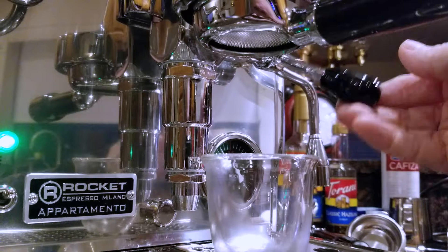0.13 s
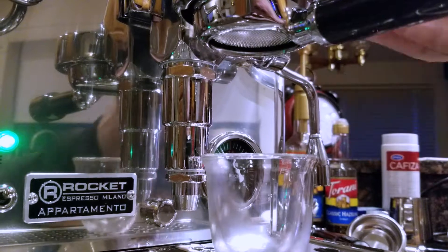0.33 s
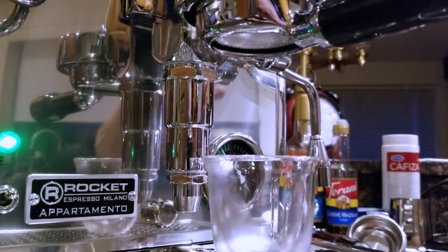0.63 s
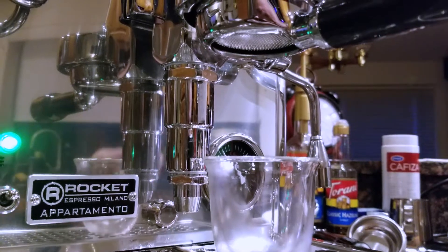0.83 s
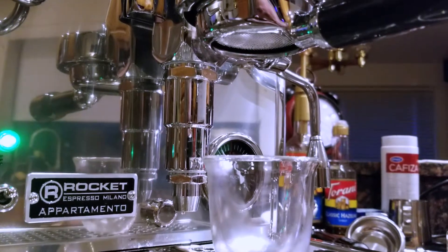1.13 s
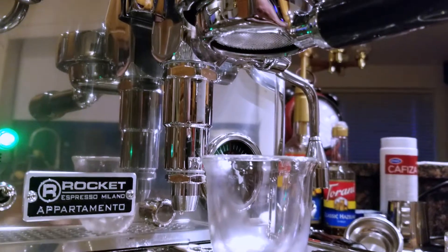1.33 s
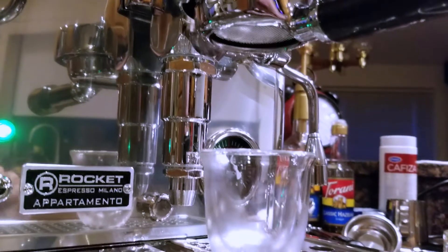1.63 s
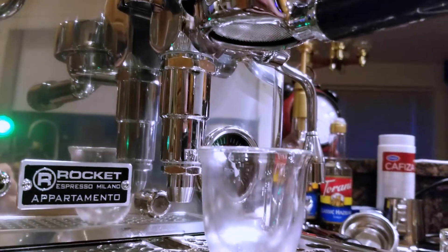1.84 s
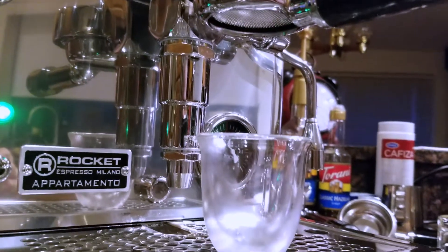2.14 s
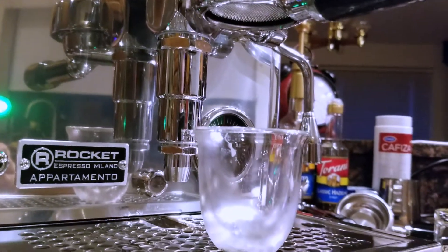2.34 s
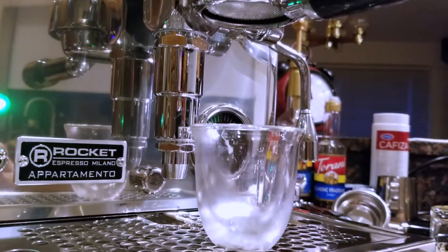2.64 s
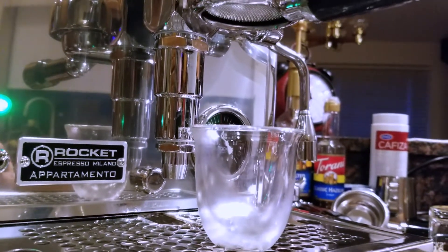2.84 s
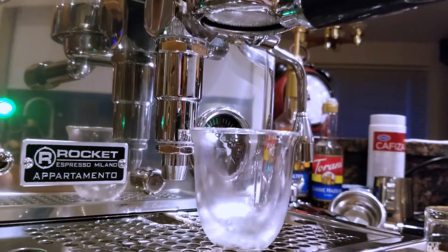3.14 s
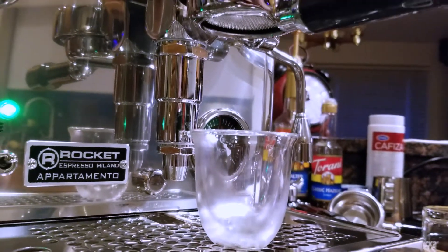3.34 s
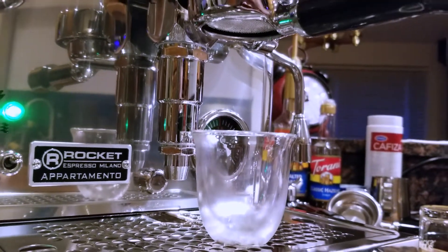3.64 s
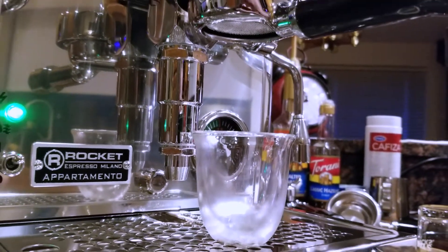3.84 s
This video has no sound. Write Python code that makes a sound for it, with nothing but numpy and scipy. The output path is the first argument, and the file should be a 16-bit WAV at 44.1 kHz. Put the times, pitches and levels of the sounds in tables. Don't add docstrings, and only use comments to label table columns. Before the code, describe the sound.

A lever clicks and thuds, then a vibrating coffee machine pump drones with rattle and hiss

```python
import sys
import numpy as np
from scipy import signal
from scipy.fft import rfft, irfft
from scipy.io import wavfile
from scipy.ndimage import uniform_filter1d

SR = 44100
rng = np.random.default_rng(int(sys.argv[2]) if len(sys.argv) > 2 else 0)


def natural_amplitude(level_db):
    exponent = np.asarray(level_db, float) / 20
    return 10 ** exponent


def bounce(signal):
    frames = np.transpose(np.atleast_2d(signal))
    limited = np.clip(frames, -1, 1)
    pcm = np.round(limited * 32767).astype(np.int16)
    wavfile.write(sys.argv[1], SR, pcm)


N = 176400
START_S = .116
MAINS_HZ, PUMP_ON_S = 60.02, 0.3883


def at(points, x, log=False):
    p, f = np.array(points, float), np.log if log else np.asarray
    return [np.interp(f(x), f(p[:, 0]), column) for column in p.T[1:]]


def unit(x):
    return x / np.sqrt(np.mean(x ** 2) + 1e-20)


def drift(rate):
    r = np.exp(-80 * np.pi * rate / SR)
    noise = rng.standard_normal(N // 40 + 2002)
    slow = signal.lfilter([1], [1, -2 * r, r * r], noise)[2000:]
    return np.interp(np.arange(N) / 40, np.arange(len(slow)), unit(slow))


def filtered(x, order, hz, kind):
    return signal.sosfilt(signal.butter(order, hz, kind, fs=SR, output="sos"), x)


def resonance(x, hz, width_hz):
    r = np.exp(-np.pi * width_hz / SR)
    return signal.lfilter([1, 0, -1], [1, -2 * r * np.cos(2 * np.pi * hz / SR), r * r], x)


# f/Hz, left-right likeness
CHANNEL_LIKENESS = [(60, 0.66), (300, 0.85), (600, 0.64), (1200, 0.14), (3000, 0.027), (15000, 0.048)]


def stereo(hz, pair):
    alike = np.clip(at(CHANNEL_LIKENESS, hz, log=True)[0], 0, 1)
    return np.sqrt(1 + alike) * pair[0] + np.sqrt(1 - alike) * pair[1] * [[1], [-1]]


def coloured(spectrum, low_hz, high_hz, patchy_db):
    out, white = 0, rng.standard_normal((2, 2, N))
    edges = np.geomspace(low_hz, high_hz, int(2 * np.log2(high_hz / low_hz)) + 1)
    for k, (low, high) in enumerate(zip(edges, edges[1:])):
        hz = np.sqrt(low * high)
        pair = filtered(white[k % 2], 2, [low, high], "band")
        level_db = at(spectrum, hz, log=True)[0] + patchy_db * drift(4.6)
        out = out + natural_amplitude(level_db) * stereo(hz, pair)
    return unit(out)


# f/Hz, level/dB per Hz
ROOM_SPECTRUM = [(40, -8), (75, 0), (150, -7), (320, -3), (800, -11), (1200, -22), (2000, -13), (3500, -26),
                 (15800, -27)]
# t/s, level/dB
ROOM_FADE = [(.116, -85), (.17, -83), (.2, -75), (.24, -70), (.3, -69), (.36, -74), (.5, -70)]


def room_tone(t):
    return natural_amplitude(at(ROOM_FADE, t)[0]) * coloured(ROOM_SPECTRUM, 37.3, 17700, patchy_db=3)


# t/s, level/dB
HAND_RUMBLE = [(.12, -95), (.36, -95), (.44, -73), (.6, -77), (.9, -84), (1.04, -68.5), (1.2, -71),
               (2.6, -73), (4, -88)]


def hand_rumble(t):
    low = filtered(rng.standard_normal((2, N)), 4, [40, 68.5], "band")
    return natural_amplitude(at(HAND_RUMBLE, t)[0]) * stereo(60, unit(low))


def kitchen(x):
    t60_s, wall_cut_hz = .26, 5000
    t = np.arange(SR // 2) / SR
    noise = signal.lfilter(*signal.butter(1, wall_cut_hz, fs=SR), rng.standard_normal((2, len(t))))
    tail = noise * natural_amplitude(-60 * t / t60_s) * (t > .003)
    tail = tail / np.sqrt(np.sum(tail ** 2) / 2)
    return signal.fftconvolve(x[None], tail, axes=1)[:, :N]


def strike(where, gains, hz, t60_s):
    clicks = np.full(N, 1e-18)
    clicks[where] = gains
    r, w = natural_amplitude(-60 / (t60_s * SR)), 2 * np.pi * hz / SR
    return signal.lfilter([0, np.sin(w)], [1, -2 * r * np.cos(w), r * r], clicks)


def crack(where, level_db):
    t60_s = .035
    clicks = np.full(N, 1e-18)
    clicks[where] = natural_amplitude(level_db - 19)
    pulses = uniform_filter1d(clicks, size=40, origin=-20) * 20
    envelope = signal.lfilter([1], [1, -natural_amplitude(-60 / (t60_s * SR))], pulses)
    return filtered(envelope * rng.standard_normal(N), 2, 4500, "high")


def scrape():
    start_s, t60_s, level_db = .2305, .045, -66
    since = np.arange(N) / SR - start_s
    burst = natural_amplitude(level_db - 60 * np.abs(since) / t60_s) * (since > 0) * rng.standard_normal(N)
    return filtered(burst, 2, 6000, "high")


# t/s, steel level/dB, switch level/dB, thud level/dB
CONTACTS = [
    (.2655, -52, -68, -74),
    (.290, -76, -72, -60),
    (.310, -90, -80, -63),
    (.377, -74, -51, -76),
    (.402, -90, -80, -60),
]
# f/Hz, level/dB, t60/s
STEEL_MODES = [(1443, -9, .08), (1800, -16, .05), (2410, -14, .05), (2750, -11, .05), (4800, -20, .015),
               (5800, 1, .014), (6150, 0, .014), (7930, -5, .012), (10150, 2, .014), (10700, 1, .012),
               (11600, -4, .012), (13500, -12, .01)]
SWITCH_MODES = [(1020, -16, .05), (2272, 0, .05), (2480, -12, .03), (3564, -18, .012)]
THUD_MODES = [(109, 5, .14), (215, 1, 0.06), (412, -5, .06), (790, -9, 0.04)]
# t/s, f/Hz, level/dB
SMALL_TICKS = [(0.2, 310, -65), (.197, 5600, -80), (.205, 5300, -82), (.19, 2000, -80),
               (.232, 12300, -72), (.283, 3400, -68), (.463, 3800, -52), (.4655, 4350, -49),
               (.48, 6400, -59), (.487, 6400, -59), (.578, 8200, -54)]


def lever():
    out, rows = np.zeros(N), np.array(CONTACTS)
    where = (rows[:, 0] * SR).astype(int)
    for column, body in enumerate((STEEL_MODES, SWITCH_MODES, THUD_MODES)):
        for hz, db, t60_s in body:
            late = rng.integers(0, 40, len(rows))
            gains = natural_amplitude(rows[:, column + 1] + db + 3.5 + rng.normal(0, 1, len(rows)))
            ring = strike(where + late, gains, hz, t60_s)
            soft = int(min(.003, .3 / hz) * SR) if body is THUD_MODES else 1
            out += uniform_filter1d(ring, size=soft, origin=(soft - 1) // 2)
    for s, hz, db in SMALL_TICKS:
        out += strike(int(s * SR), natural_amplitude(db), hz, 25 / hz)
    return out + scrape() + crack(where, rows[:, 1])


# t/s, stage (0 filling, 1 building, 2 full)
BACK_PRESSURE = [(.4, 0), (1.3, .1), (1.7, .8), (2.45, 1.14), (2.8, 1.6), (3.1, 2), (4, 2)]
RETURN_PHASE = .31


def puffs(t):
    stroke_phase, decay_s, spread_db, bed = 0.57, 0.0055, 3, 0.39
    cycle = t * MAINS_HZ - stroke_phase + 1
    strength = natural_amplitude(spread_db * np.clip(rng.standard_normal(300), -2, 1.5))[cycle.astype(int)]
    burst = strength * np.exp(-(cycle % 1) / MAINS_HZ / decay_s)
    return unit(bed + uniform_filter1d(burst, size=110))


def buzz(modes, gate):
    out = 0
    for hz, width_hz, db in modes:
        x = unit(resonance(gate * rng.standard_normal(N), hz, max(width_hz, 70)))
        pan_db, lag = rng.normal(1, 1), rng.integers(-2, 3)
        sides = np.array([natural_amplitude(pan_db) * x, natural_amplitude(-pan_db) * np.roll(x, lag)])
        out = out + natural_amplitude(db + 1.6 * drift(13.0)) * np.sqrt(width_hz / 100) * sides
    return out


# f/Hz, width/Hz, level/dB
TRAY_MODES = [(3320, 90, -2), (3630, 100, -1), (5930, 100, -5), (6440, 130, -2), (7480, 350, -4),
              (8240, 250, -4), (10600, 300, -4), (11100, 200, -4), (12600, 350, -4)]
LOOSE_MODES = [(11400, 250, -2), (12400, 300, -2.5), (13600, 200, 0), (14200, 250, -3), (15500, 250, 3)]


def fittings(t, puff):
    loose_end_s = 1.085
    loose = natural_amplitude(-71) / (1 + np.exp(np.clip((t - loose_end_s) / .01, -50, 50)))
    return natural_amplitude(-74) * buzz(TRAY_MODES, puff) + loose * buzz(LOOSE_MODES, puff)


# f/Hz, level/dB per Hz
HISS_SPECTRUM = [(1470, -31), (2500, -1), (2720, -9), (3590, -4), (5120, -4), (7480, -4), (8720, -7.5),
                 (10900, -3.5), (15800, -3)]


def water(t, puff):
    near_share, near_s, level_db, filling_db = .35, .006, -60, -1.5
    hiss = coloured(HISS_SPECTRUM, 2430, 16600, patchy_db=1.74)
    near = rng.standard_normal((2, 600)) * np.exp(-np.arange(600) / SR / near_s)
    reflected = unit(signal.fftconvolve(np.roll(hiss[:1], 9000), near, axes=1)[:, :N])
    hiss = np.sqrt(1 - near_share) * hiss + np.sqrt(near_share) * reflected
    empty = np.clip(1 - 2 * at(BACK_PRESSURE, t)[0], 0, 1)
    return puff * natural_amplitude(level_db + filling_db * empty) * natural_amplitude([[.8], [-.8]]) * hiss


# f/Hz, width/Hz, level/dB
CASE_MODES = [(298, 86, -58.5), (613, 51, -63.5), (800, 19, -66.5), (919, 80, -58), (1350, 280, -68.5),
              (1613, 175, -62), (1880, 300, -62.5), (2303, 240, -64)]
# f/Hz, level/dB per Hz
SHAKE_SPECTRUM = [(35, -57), (60, -8), (241, -11), (298, 7), (357, 10), (908, -15), (1160, -18), (1530, 11),
                  (3000, -45), (3900, -71), (6600, -120)]
# t/s, level/dB
RATTLE_EFFORT = [(.4, -57.5), (.5, -59), (1.2, -58), (2.2, -55.5), (2.65, -56), (2.85, -58), (3.4, -57),
                 (4, -57.5)]


def rattle(t, puff):
    throb = 1 + 0.23 * np.cos(4 * np.pi * (MAINS_HZ * t - RETURN_PHASE))
    gate = (1 + 0.3 * (puff - 1)) * throb
    since = t - PUMP_ON_S
    dry_db = 4 * np.exp(-np.abs(since) / 0.72)
    out = 0
    for hz, width_hz, db in CASE_MODES:
        pair = unit(resonance(gate * rng.standard_normal((2, N)), hz, width_hz))
        level_db = db + 0.45 * drift(11) + (850 < hz < 1000) * dry_db
        out = out + natural_amplitude(level_db) * natural_amplitude([[.5], [-.5]]) * stereo(hz, pair)
    surge_db = 12 * np.exp(-np.maximum(since, 0) / 0.062)
    out = out + natural_amplitude(-64 + surge_db) * coloured(SHAKE_SPECTRUM, 66, 2560, patchy_db=-2.5) * gate
    return out * natural_amplitude(at(RATTLE_EFFORT, t)[0] + 55 + .7 * drift(12))


def start_phase(k):
    free = rng.uniform(0, 2 * np.pi)
    if k < 6.5:
        return .7
    return free if k < 12.5 else -2 * np.pi * k * RETURN_PHASE


# f/Hz, left-right level/dB, left lead/rad
TONE_PLACE = [(60, 2.5, .15), (120, 0, .4), (180, .7, .1), (240, -4, .3), (300, 2.4, 0), (420, 2.4, .3),
              (540, -1.5, .4), (600, 2, .3), (660, -3.5, .3), (780, -7.5, .4), (840, -11, 2.5),
              (900, -.5, 1.4), (960, -6, -1.1), (1300, 0, .5)]


def tone_pair(t, hz, db, wander_rad):
    pan_db, lead = at(TONE_PLACE, hz, log=True)
    turn = 2 * np.pi * hz * t + start_phase(hz / MAINS_HZ) + wander_rad
    sides = np.sin(turn + np.array([[lead / 2], [-lead / 2]]))
    return np.sqrt(2) * natural_amplitude(db) * natural_amplitude([[pan_db / 2], [-pan_db / 2]]) * sides


# t/s, level/dB
PANEL_LEVEL = [(.4, -44), (.46, -39), (.75, -38), (1.05, -39.5), (1.22, -37), (1.55, -36.5), (1.8, -35),
               (2.0, -36.5), (2.15, -36.5), (2.29, -36.5), (2.45, -39), (2.65, -39), (2.75, -42.5),
               (3.3, -44), (4, -44.5)]
# harmonic number, filling level/dB, building level/dB, full level/dB
CASE_HARMONICS = [(1, -64.5, -63.5, -85), (2, -58.5, -64, -54.5), (3, -61, -55.5, -56.5),
                  (4, -73, -55.5, -56), (6, -64, -60.5, -83), (7, -63, -58.5, -64.5), (8, -67, -68, -81),
                  (9, -64.5, -63.5, -67), (10, -68.5, -64, -58.5), (11, -70, -61, -75.5),
                  (12, -80, -78, -75), (13, -61, -57, -59), (14, -66.5, -64, -72), (15, -55, -55.5, -55.5),
                  (16, -64.5, -68, -66.5)]
# harmonic number, level/dB
UPPER_HARMONICS = [(17, -69.5), (21, -71), (22, -67.5), (25, -68.5), (26, -70), (33, -72)]


def hum(t):
    load = at(BACK_PRESSURE, t)[0]
    out = tone_pair(t, 5 * MAINS_HZ, at(PANEL_LEVEL, t)[0] + 0.85 * drift(14), .08 * drift(6))
    for k, *stages_db in CASE_HARMONICS:
        k = round(k)
        db = np.interp(load, np.arange(3), stages_db) + np.sqrt(k / 5) * drift(1.58)
        out = out + tone_pair(t, k * MAINS_HZ, db, 0.053 * k * drift(1.58))
    for k, db in UPPER_HARMONICS:
        out = out + tone_pair(t, round(k) * MAINS_HZ, db + 4 * drift(8), 1.5 * drift(10))
    return out


def pump(t):
    puff = puffs(t)
    running = 1 - np.exp(-np.maximum(t - PUMP_ON_S, 0) / 0.016)
    flowing = np.clip((t - .376) / 0.02, 0, 1) ** .5
    return running * (hum(t) + rattle(t, puff)) + flowing * (water(t, puff) + fittings(t, puff))


def scene():
    t = np.arange(N) / SR
    hits = lever()
    background = room_tone(t) + hand_rumble(t)
    return (background + hits + natural_amplitude(-11) * kitchen(hits) + pump(t)) * (t > START_S)


def low_pass(x):
    return signal.sosfilt(signal.butter(12, 16620, fs=SR, output="sos"), x)


def record(dry):
    passed = np.fft.rfftfreq(N, 1 / SR) < 15780
    mix = irfft(rfft(dry) * passed, N) * (np.arange(N) > START_S * SR)
    return low_pass(mix)


dry = scene()
out = record(dry)
bounce(out)
```